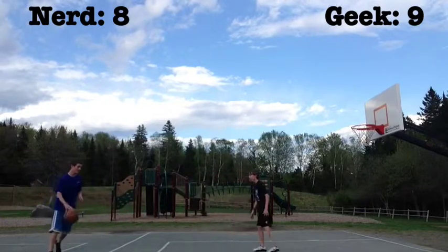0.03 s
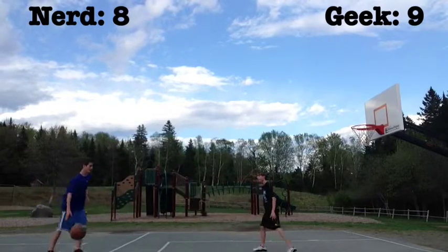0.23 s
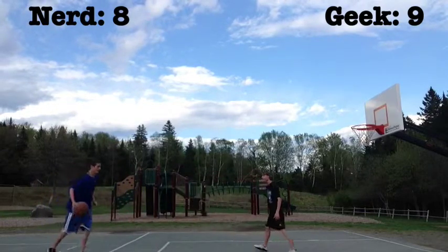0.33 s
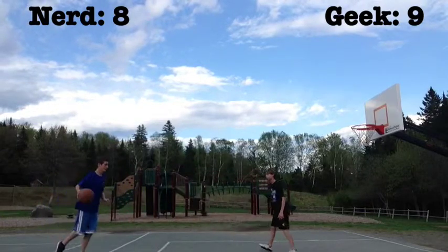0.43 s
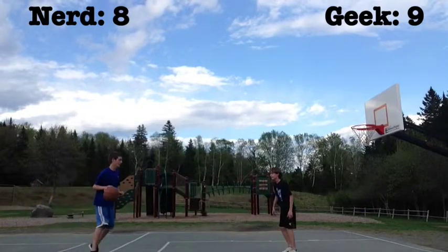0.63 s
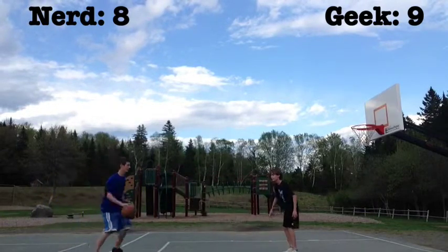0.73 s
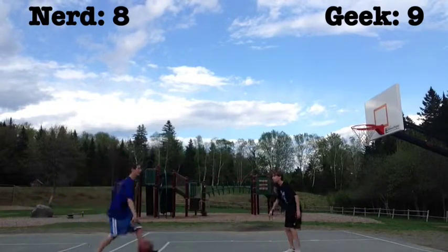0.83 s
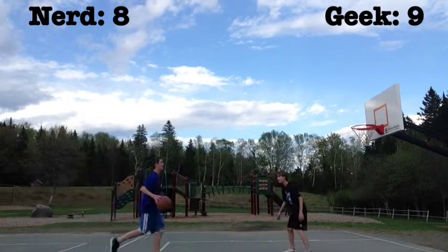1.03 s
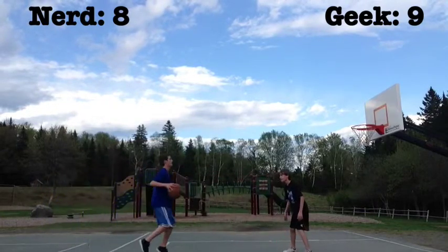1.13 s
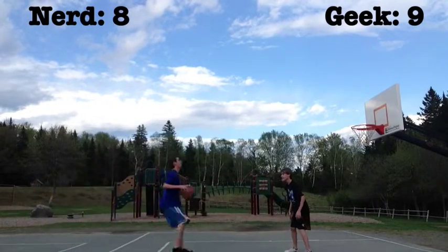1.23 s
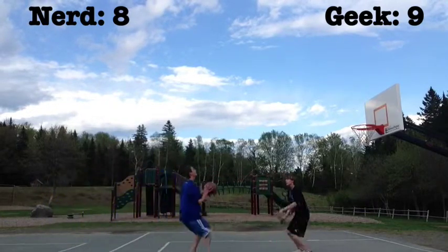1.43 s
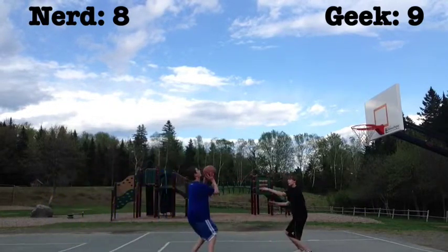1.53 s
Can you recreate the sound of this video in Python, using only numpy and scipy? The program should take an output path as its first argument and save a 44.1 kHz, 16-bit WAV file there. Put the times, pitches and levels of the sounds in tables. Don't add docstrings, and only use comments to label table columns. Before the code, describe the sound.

On an outdoor court, one hard basketball bounce, a scraping sole, a second bounce with ticking grit, then soft running steps and a two-handed catch, with short reflections over faint air, through a small thin-bass microphone.

```python
import sys
import numpy as np
from scipy import signal
from scipy.fft import rfft, irfft
from scipy.io import wavfile
from scipy.ndimage import uniform_filter1d

SR = 44100
rng = np.random.default_rng(int(sys.argv[2]) if len(sys.argv) > 2 else 0)


def persist_wave(psi):
    counts = np.round(np.clip(psi, -1, 1) * 32767).astype(np.int16)
    wavfile.write(sys.argv[1], SR, np.atleast_2d(counts).T)


def gain_from_db(level_db):
    decades = np.asarray(level_db, float) / 20
    return 10 ** decades


N = 70560

# (frequency [Hz], level [dB])
AIR_SPECTRUM = [(24, -17), (60, -30), (95, -25), (125, -6.5), (215, 0), (810, -17.5), (1630, -19),
                (2500, -23.5), (15000, -29.5)]
# (time [s], level [dB])
AIR_LEVEL = [(0, -7), (.9, -5.5), (1.1, -3), (1.6, -4.5)]
# (time [s], level [dB], pitch
# [Hz], T60 [s])
SHORT_TICKS = [(.029, -37, 3380, 0.0037), (0.0283, -41, 5300, .003), (0.0296, -55, 7900, 0.0025),
               (.092, -48, 8000, .003), (.2265, -34, 2960, 0.015), (.243, -32, 1040, 0.028),
               (.248, -43, 930, 0.016), (.332, -43, 6000, .005), (.346, -47, 3980, .004),
               (0.3495, -36.5, 2200, 0.0063), (.347, -51, 895, 0.0091), (.355, -48, 695, 0.017),
               (.3515, -36, 5140, 0.005), (.3515, -37, 7240, 0.0055), (.3515, -46, 10400, 0.0049),
               (.368, -47, 8000, 0.0051), (.408, -48, 5000, .003), (0.4315, -40.5, 2170, 0.013),
               (.4325, -47, 1750, 0.011), (.432, -41, 1240, 0.013), (.445, -48, 10500, 0.0046),
               (.616, -45, 1840, 0.016), (.627, -36, 1690, 0.018), (0.9222, -28, 4540, 0.0088),
               (0.9218, -25, 2300, 0.0087), (0.9286, -32, 2400, .008), (.9305, -39, 4000, .008),
               (0.94, -45, 2580, .02), (.947, -41, 2500, 0.018), (.9295, -21, 1350, 0.011),
               (.9297, -27, 660, 0.018), (.9335, -15, 1340, 0.0086), (.942, -41, 1510, .015),
               (.946, -27, 1240, 0.014), (0.9595, -32.5, 1180, 0.024), (1.003, -40, 2190, 0.012),
               (1.02, -45, 2005, 0.025), (1.073, -41, 4370, 0.0059), (1.14, -51.5, 1200, 0.15),
               (1.191, -46, 1900, 0.012), (1.276, -49, 1210, 0.068), (1.406, -40, 1900, 0.024),
               (1.416, -38, 1930, 0.015), (1.44, -44, 2150, 0.052), (1.4215, -36, 2020, 0.023),
               (1.428, -39, 2100, 0.018), (1.431, -42, 620, 0.02), (1.4, -38, 850, 0.026),
               (1.444, -39, 350, 0.018), (1.45, -35, 5300, 0.0029), (1.581, -42.5, 930, 0.022),
               (1.583, -51, 636, 0.021)]
# (start [s], length [s], level [dB], tilt
# [dB/octave], peak as share of length [0-1])
SHORT_SCUFFS = [(0, 0.041, -59, 5.5, 0.01), (0.027, 0.026, -56, 5.5, 0.06), (0.213, 0.0027, -54, -6, 0.8),
                (0.916, 0.0034, -47, 1, 0.76), (0.233, 0.15, -53, 5, 0.5), (0.343, 0.045, -47, -2, 0.08),
                (0.812, 0.035, -59, 2.5, 0.14), (0.973, 0.077, -45.5, 6, 0), (0.995, 0.07, -42, 0.5, 0.35),
                (1.065, 0.028, -68, -11, 1), (1.13, 0.014, -87, -4, .3), (1.187, 0.015, -53.5, 13, 0.54),
                (1.331, 0.051, -43, 4, 0.04), (1.353, 0.08, -46.5, 0.5, 1), (1.381, 0.12, -46, -0.5, 0.53)]
# (frequency [Hz], level [dB])
SCUFF_SPECTRUM = [(180, -17), (300, 0.5), (1190, -5), (2100, -6.5), (2440, -8.5), (5430, -10.5),
                  (14200, -25), (16000, -28)]
# (time [s], level [dB], pitch [Hz], T60 [s])
FOOTFALLS = [(0.301, -43.5, 246, 0.07), (0.344, -37, 238, 0.026), (0.437, -44.5, 198.5, 0.084),
             (.608, -44.5, 257, 0.043), (1.009, -48, 220, 0.079), (1.061, -37.5, 204, 0.081),
             (1.093, -44.5, 330, 0.072), (1.146, -33, 252, 0.037), (1.18, -42.5, 231, 0.071),
             (1.236, -39.5, 230, 0.046), (1.275, -42, 189, 0.081), (1.279, -45, 473, 0.078),
             (1.288, -43, 365, 0.078), (1.292, -52, 200, 0.043), (1.386, -34, 260, .05),
             (1.331, -36, 400, 0.014), (1.427, -67, 403, 0.041), (1.581, -39.5, 298, 0.035),
             (0.439, -50, 113, 0.11), (1.148, -45, 113, 0.081)]
# (time [s], level [dB], grit band centre [Hz], grit band share [dB])
SOLE_DRAG = [
    (0.603, -67, 4480, -24),
    (0.61, -45.5, 5070, -2),
    (0.639, -41, 4650, -4),
    (.664, -46, 6130, -33),
    (0.701, -41, 3780, 13),
    (0.743, -47.5, 5300, -11),
    (0.764, -52.5, 4140, -25),
    (.81, -69, 3420, -1),
]
# (frequency [Hz], level [dB])
DRAG_SPECTRUM = [(88, -48), (150, -29), (457, -12), (1080, -7.5), (1420, -10), (5150, -7.5), (13700, -13),
                 (15100, -14), (16000, -45)]
# (frequency [Hz], T60 [s])
SCATTER_DECAY = [(100, 0.091), (300, 0.27), (1000, 0.13), (3000, 0.25), (8000, 0.063), (15000, 0.33)]
# (delay [s], level [dB], smear [s])
SINGLE_ECHOES = [(.0095, -32.5, .002), (0.0174, -17.5, 0.0031), (.0225, -27.5, .002), (.029, -38, .003)]
# (time [s], body [dB], crack [dB], rattle [dB], lowest frequency [Hz])
BALL_BLOWS = [
    (0.2168, -19, -28.5, -25, 60),
    (0.9198, -20.5, -32, -22, 50),
    (1.3606, -14.5, -34.5, -30.5, 130),
]
# (dip [dB], skin ring [dB], skin ring [Hz], ground copy [dB], dip width [s])
BLOW_SNAPS = [
    (-3.5, -21, 7000, -2, .000043),
    (-2.5, -11, 6000, -40, .000065),
    (-28, -40, 4700, -10, .00006),
]
# (frequency [Hz], level [dB], T60 [s])
FIRST_BOUNCE_MODES = [(140, -5.5, 0.075), (207.3, 5, 0.048), (245, -2, 0.09), (357, -14, 0.063),
                      (550, -13.5, 0.03), (720, -11, 0.034), (1065, -10, 0.13), (1363, 10.5, 0.0088),
                      (2910, -15, 0.037), (2490, -0.5, 0.0086)]
# (frequency [Hz], level [dB], T60 [s])
SECOND_BOUNCE_MODES = [(140.1, 1, 0.067), (217.6, 5.5, 0.04), (245.3, -8.5, 0.12), (311.4, -5.5, 0.1),
                       (413, -9.5, 0.073), (640, -11, 0.017), (1123, -1, 0.049), (1328, 4.5, 0.016),
                       (1850, 1.5, 0.012), (2790, -13, 0.014)]
# (frequency [Hz], level [dB], T60 [s])
CATCH_MODES = [(254, 2.5, 0.025), (350, -3, .018), (474, -7, .014), (597, -7.5, .015), (756, -15.5, .012),
               (1116, 1.5, 0.011), (1440, -3, 0.027), (1900, -5, 0.0044), (2090, -18.5, 0.012)]
# (frequency [Hz], level [dB])
CRACK_SPECTRUM = [(300, -14), (1500, -3), (4000, -4), (6500, 0), (9000, -8), (13000, -13), (16000, -16)]
# (frequency [Hz], level [dB])
RATTLE_SPECTRUM = [(150, -3.5), (400, 7.5), (1100, -1.5), (2200, -13), (5000, -33), (9000, -34.5),
                   (16000, -34)]

SHELL_HZ = 650
SNAP_S = 0.00004


def evened(x):
    return x / np.sqrt(np.mean(x ** 2) + 1e-20)


def noise(count):
    return rng.standard_normal(count)


def read(points, hz):
    f, value = np.transpose(points)
    return np.interp(np.log(hz + 1), np.log(f + 1), value)


def colour(x, points, tilt_db=0):
    hz = np.fft.rfftfreq(len(x), 1 / SR)
    gain_db = read(points, hz) + tilt_db * np.log2((hz + 100) / 2000)
    return evened(irfft(rfft(x) * gain_from_db(gain_db), len(x)))


def add(mix, s, sound):
    part = mix[round(s * SR):][:len(sound)]
    part += sound[:len(part)]


def resonate(x, hz, width):
    turn = np.exp(2j * np.pi * np.cumsum(hz * np.ones(len(x))) / SR)
    r = np.exp(-np.pi * width / SR)
    return 2 * (turn * signal.lfilter([1 - r], [1, -r], x / turn + 1e-18)).real


def high_pass(x, order, hz):
    return signal.sosfilt(signal.butter(order, hz, "high", fs=SR, output="sos"), x)


def grit(count, spread_db=4.0):
    return noise(count) * gain_from_db(spread_db * np.minimum(rng.exponential(1, count), 4))


def air():
    frames = N // 128 + 6
    a, b, patches = rng.standard_normal((frames, 257, 3)).T
    patches = uniform_filter1d(patches, 5, 0)
    patches = evened(uniform_filter1d(patches, 12, 1))
    z = (a + 1j * b) * gain_from_db(1.8 * patches)
    sound = signal.istft(z, nperseg=512, noverlap=384)[1][:N]
    swell_db = np.interp(np.arange(N) / SR, *np.transpose(AIR_LEVEL))
    return gain_from_db(-54.5 + swell_db) * colour(sound, AIR_SPECTRUM)


def ticks():
    out, t = np.zeros(N), np.arange(2500) / SR
    for s, db, hz, t60 in SHORT_TICKS:
        width = 0.5 * hz
        edge = evened(resonate(resonate(noise(2500), hz, width), hz, width))
        ring = 0.88 * np.sin(2 * np.pi * hz * t) + 0.57 * edge
        add(out, s, gain_from_db(db - 60 * t / t60) * np.tanh(0.73 * t * hz) * ring)
    return out


def scuffs():
    out, t = np.zeros(N), np.arange(6000) / SR
    for s, length, db, tilt_db, peak in SHORT_SCUFFS:
        u, peak = t / length, np.clip(peak, 0.03, 0.9)
        fade = gain_from_db(-18 * ((u - peak) / (1 - peak)) ** 0.76)
        shape = np.where(u < peak, u / peak, fade)
        add(out, s, gain_from_db(db) * shape * colour(grit(6000), SCUFF_SPECTRUM, tilt_db))
    return out


def footfalls():
    out, t = np.zeros(N), np.arange(6000) / SR
    for s, db, hz, t60 in FOOTFALLS:
        thud = np.sin(2 * np.pi * hz * t) + 0.19 * evened(resonate(noise(6000), 330, 430))
        add(out, s, gain_from_db(db - 60 * t / t60) * np.tanh((t / 0.0026) ** 2) * thud)
    return out


def feet():
    return high_pass(scuffs() + footfalls(), 2, 110)


def drag():
    t = np.arange(N) / SR
    s, db, hz, share_db = np.transpose(SOLE_DRAG)
    stutter = gain_from_db(1.1 * evened(uniform_filter1d(noise(N), 150)))
    slips = grit(N, 3.3) * stutter
    centre, width_hz = np.interp(t, s, hz), 3800
    band = evened(resonate(resonate(slips, centre, width_hz), centre, width_hz))
    share = gain_from_db(np.interp(t, s, share_db))
    level = gain_from_db(np.interp(t, s, db, -140, -140)) / np.sqrt(1 + share ** 2)
    scrape = level * (colour(slips, DRAG_SPECTRUM) + share * band)
    squeak = evened(resonate(noise(N), 1750, 200)) * np.exp(-((t - 0.622) / 0.017) ** 2)
    return scrape + gain_from_db(-51) * squeak


def scatter():
    near_db, far_db, far_stretch = -35, -22.5, 8.8
    taps = np.zeros(SR // 2)
    at = np.arange(100, len(taps) - 20, 20)
    taps[at + rng.integers(0, 20, len(at))] = rng.choice([-1., 1.], len(at))
    hz, t, z = signal.stft(taps, SR, nperseg=256)
    fall_db = -60 * t / read(SCATTER_DECAY, hz)[:, None]
    tail = np.zeros(len(taps))
    for db, stretch in ((near_db, 1), (far_db, far_stretch)):
        part = signal.istft(z * gain_from_db(fall_db / stretch), SR, nperseg=256)[1][:len(taps)]
        tail += gain_from_db(db) * part / np.linalg.norm(part)
    tail[:100] = 0
    return tail


def court(x):
    wall_s, wall_db, wall_dull = 0.0162, -14, 0.25
    path = scatter()
    path[0] = 1
    add(path, wall_s, gain_from_db(wall_db) * (1 - wall_dull) * wall_dull ** np.arange(20))
    lag = np.arange(400) / SR
    for s, db, smear_s in SINGLE_ECHOES:
        blur = noise(400) * np.exp(-lag / smear_s)
        add(path, s, gain_from_db(db) * blur / np.linalg.norm(blur))
    return signal.fftconvolve(x, path)[:N]


def shell(t, modes, sign):
    low_lag_s, swing_cycles = 0.00096, 0.28
    body = np.zeros(len(t))
    for hz, db, t60 in modes:
        late = np.maximum(t - 2 * SNAP_S - low_lag_s * (hz < 500), 0)
        level = (sign if hz > SHELL_HZ else 1) * gain_from_db(db - 60 * t / t60)
        body += level * np.tanh(late * hz / swing_cycles) * np.sin(2 * np.pi * hz * late)
    return body


def pressure_dip(t, ground_db, width_s):
    dip = np.zeros(len(t))
    for lag_s, db in ((0, 0), (0.00012, ground_db)):
        dip -= gain_from_db(db) * np.exp(-((t - 2 * SNAP_S - lag_s) / width_s) ** 2)
    return dip


def skin_ring(t, hz):
    rise = np.tanh((t / SNAP_S / 2) ** 2)
    return -gain_from_db(-60 * t / 0.003) * rise * np.cos(2 * np.pi * hz * (t - 2 * SNAP_S))


def contact_crack(t):
    return colour(noise(len(t)), CRACK_SPECTRUM) * np.tanh(t / 0.0005) * gain_from_db(-60 * t / 0.016)


def dense_rattle(t):
    rise_s, t60 = 0.012, 0.096
    lumps = gain_from_db(4.23 * evened(uniform_filter1d(noise(len(t)), 120)))
    return colour(noise(len(t)), RATTLE_SPECTRUM) * lumps * np.tanh(t / rise_s) * gain_from_db(-60 * t / t60)


def blow(modes, hit, snap, sign):
    body_db, crack_db, rattle_db, low_hz = hit
    dip_db, ring_db, ring_hz, ground_db, dip_s = snap
    t = np.arange(SR // 4) / SR
    sound = gain_from_db(body_db) * shell(t, modes, sign)
    sound += gain_from_db(dip_db) * pressure_dip(t, ground_db, dip_s)
    sound += gain_from_db(ring_db) * skin_ring(t, ring_hz)
    sound += gain_from_db(crack_db) * contact_crack(t)
    sound += gain_from_db(rattle_db) * dense_rattle(t)
    return high_pass(sound, 2, low_hz)


def ball():
    out = np.zeros(N)
    for (s, *hit), snap, modes in zip(BALL_BLOWS, BLOW_SNAPS, (FIRST_BOUNCE_MODES, SECOND_BOUNCE_MODES)):
        add(out, s, blow(modes, hit, snap, 0.81))
    s, *hit = BALL_BLOWS[2]
    for lag_s in (0, 0.00104):
        modes = [m for m in CATCH_MODES if m[0] > SHELL_HZ or lag_s == 0]
        add(out, s + lag_s, blow(modes, hit, BLOW_SNAPS[2], -1.07))
    return out


def scene():
    return (court(ball()) + drag() + feet() + ticks() + air())[None]


def top_cut(x):
    return signal.sosfilt(signal.butter(12, 16520, fs=SR, output="sos"), x)


def record(dry):
    x = high_pass(dry, 3, 85)
    low_pass = signal.firwin(101, 15400, window=("kaiser", 4), fs=SR)
    mix = signal.oaconvolve(x, low_pass[None], "same") + gain_from_db(-32) * x
    return top_cut(mix)


dry = scene()
out = record(dry)
persist_wave(out)
```